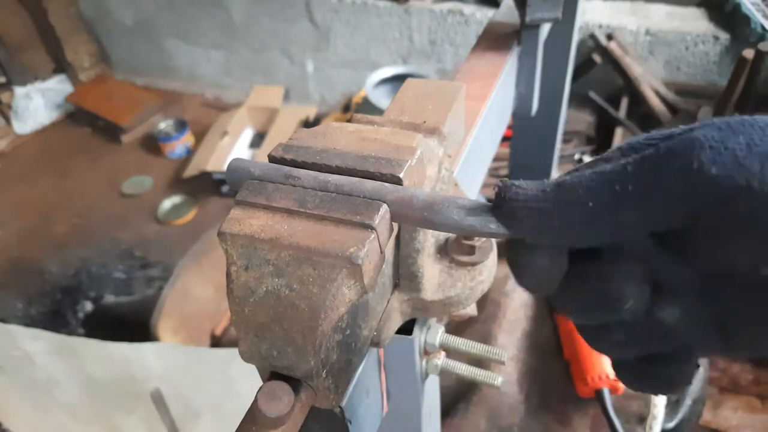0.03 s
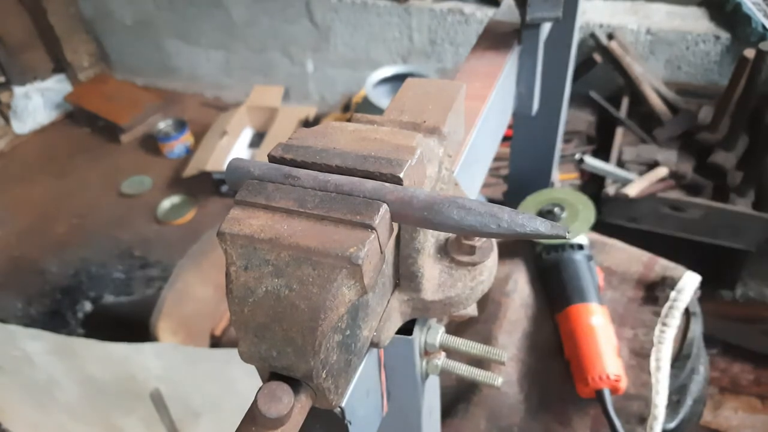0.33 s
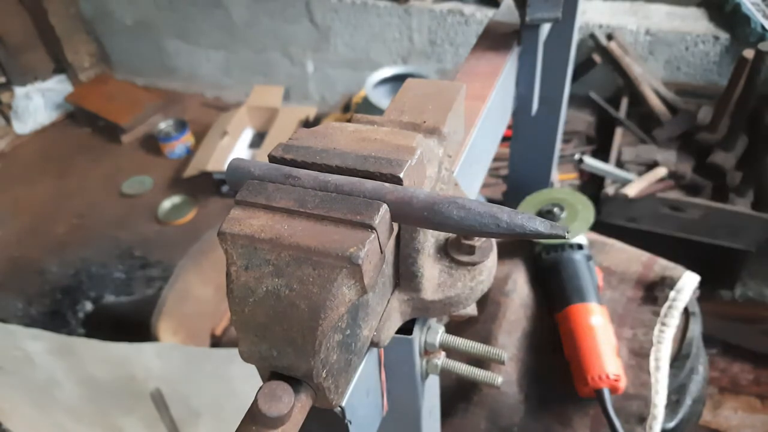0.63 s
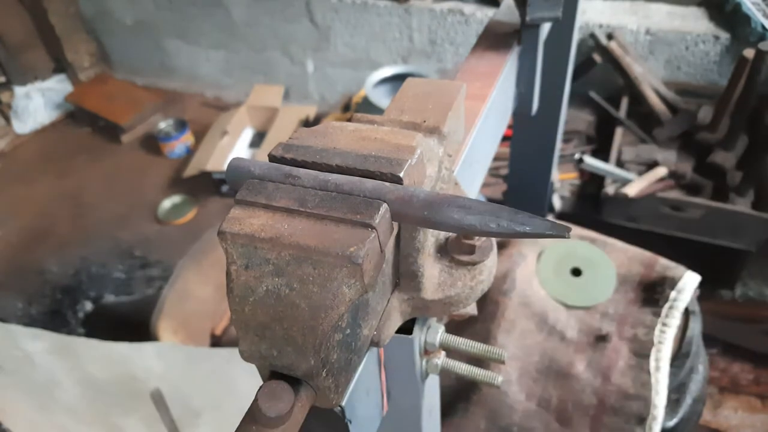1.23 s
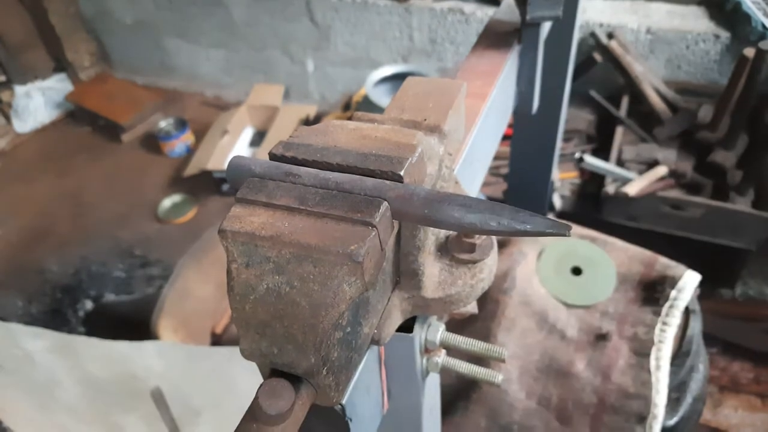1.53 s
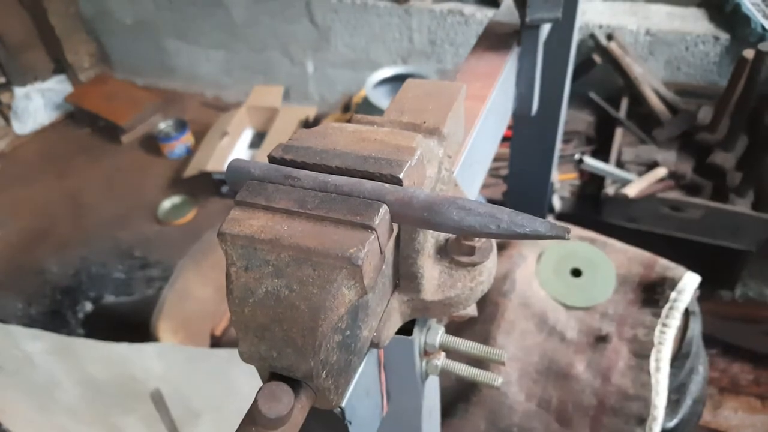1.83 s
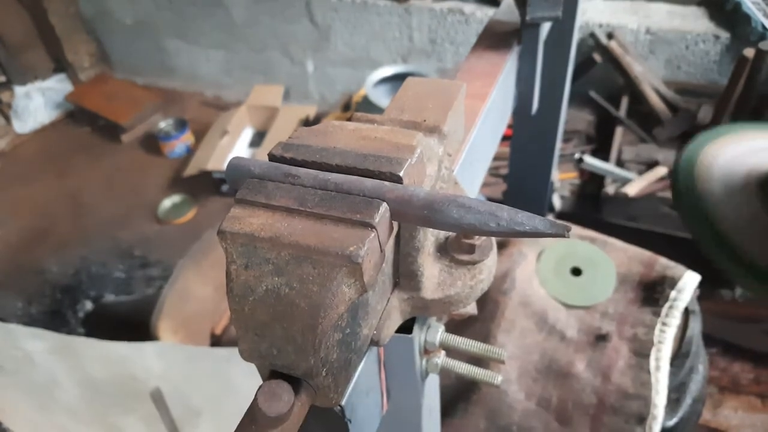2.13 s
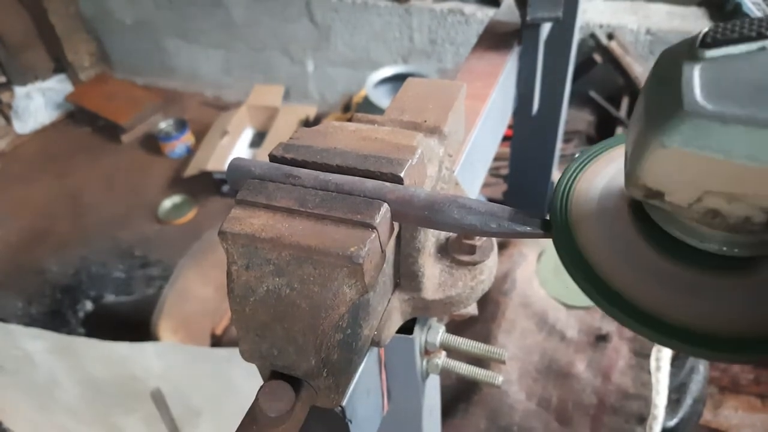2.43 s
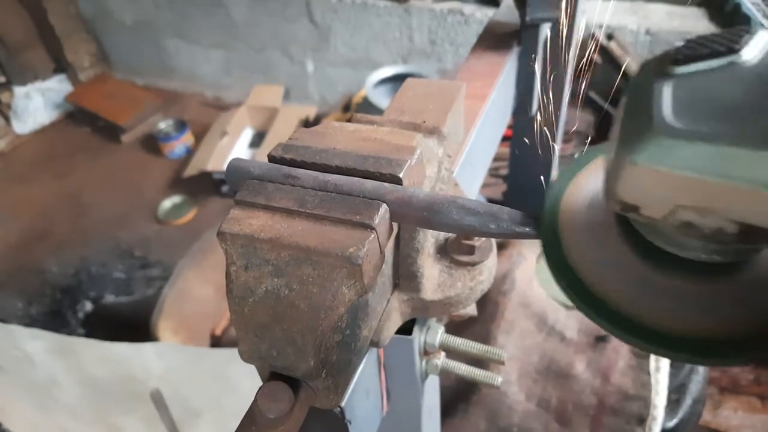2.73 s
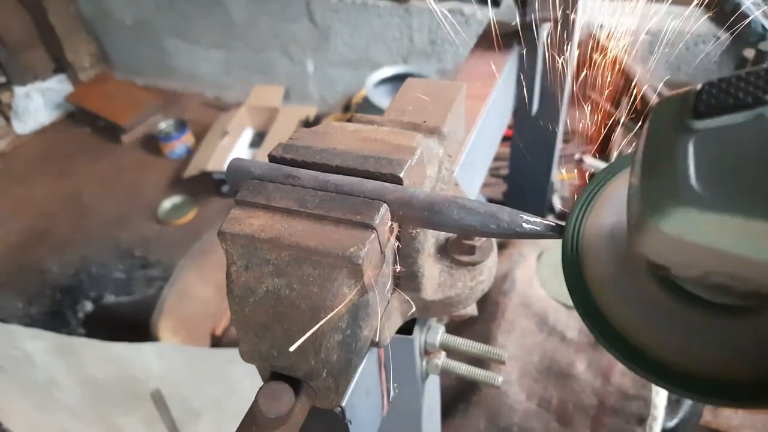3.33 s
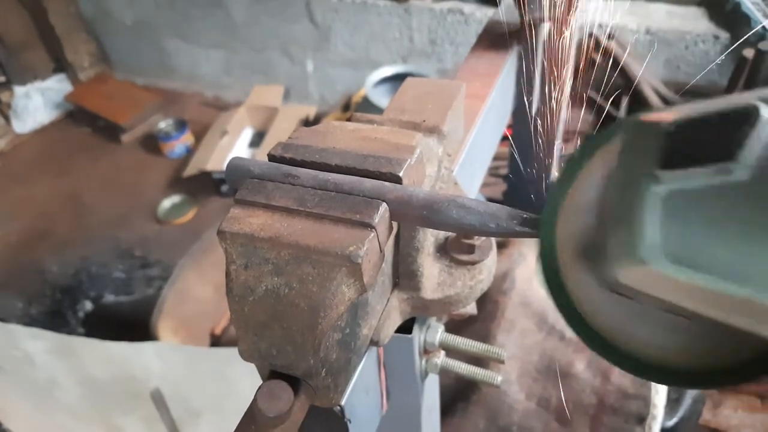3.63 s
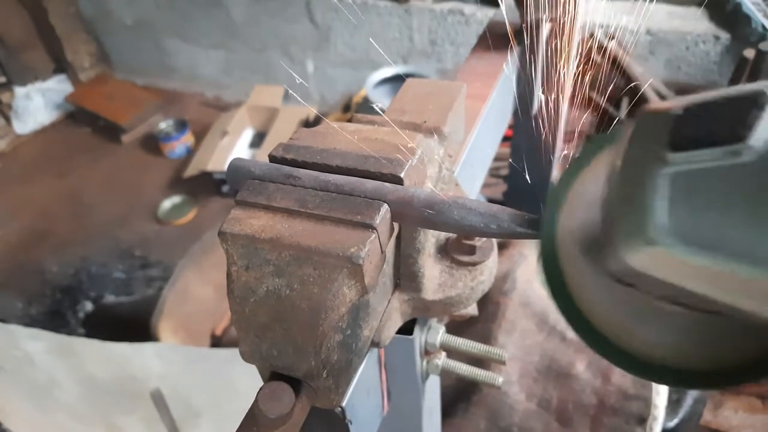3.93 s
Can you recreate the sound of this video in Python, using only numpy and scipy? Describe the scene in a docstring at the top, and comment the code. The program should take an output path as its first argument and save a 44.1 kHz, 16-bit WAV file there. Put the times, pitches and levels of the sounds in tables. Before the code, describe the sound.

An electric angle grinder starts, runs with a high whine, then rasps against steel.

```python
"""A glove rubs and bumps on an angle grinder as a hand picks it up in a quiet workshop.
The switch closes: the gears jolt, the motor winds up, and its cooling air buffets the right microphone.
The tool comes closer, its motor whining over the rush of the fan and the rattle of the gears.
Then the disc bites into a steel rod held in a vise: grit rasps, the rod rings and the motor slows a bit."""
import sys
import numpy as np
from scipy import signal
from scipy.fft import rfft, irfft
from scipy.io import wavfile
from scipy.ndimage import map_coordinates

SR = 44100
rng = np.random.default_rng(int(sys.argv[2]) if len(sys.argv) > 2 else 0)


def put_to_file(sound):
    """Save the sound as 16-bit audio at rate SR, in the file named by the first command-line argument."""
    columns = np.atleast_2d(sound).T  # one column per channel
    safe = np.clip(columns, -1, 1)
    whole_steps = np.round(safe * 32767)
    wavfile.write(sys.argv[1], SR, whole_steps.astype(np.int16))


N = 176400
TIME, FREQS = np.arange(N) / SR, np.fft.rfftfreq(N, 1 / SR)
LEFT_LAG_S = 0.0003738  # sound reaches the left microphone this much later


def amp(db):
    """Turns decibels into a gain."""
    return 10 ** (np.asarray(db) / 20)


def unit(x):
    """Scales a signal to an average (rms) strength of 1."""
    return x / np.sqrt(np.mean(x ** 2) + 1e-20)


def curve(table, column=1):
    """Joins the points of a time table with straight lines."""
    rows = np.array(table, float)
    return np.interp(TIME, rows[:, 0], rows[:, column])


def across_freqs(table):
    """Joins the points of a frequency table along a scale of octaves."""
    hz, value = np.transpose(table)
    return np.interp(np.log(FREQS + 1), np.log(hz + 1), value)


def angle(hz):
    """The angle, in radians, swept by something turning at a changing rate."""
    return 2 * np.pi * np.cumsum(hz) / SR


def wander(hz):
    """Smooth random motion, mostly slower than the given rate."""
    return unit(irfft(rfft(rng.standard_normal(N)) / (1 + (FREQS / hz) ** 4), N))


def noise():
    """Two unrelated white noises, left and right."""
    return rng.standard_normal((2, N))


def grains(per_s, spread_db):
    """Two streams of random clicks of uneven size."""
    clicks = rng.choice([-1, 1], (2, N)) * (rng.random(N) < per_s / SR)
    return clicks * amp(spread_db * np.minimum(rng.exponential(1, N), 3))


def colour(x, spectrum):
    """Shapes the bass and treble of a signal, at strength 1."""
    return unit(irfft(rfft(x) * amp(across_freqs(spectrum)), N))


def ring(x, hz, width):
    """A resonance: keeps a band around one pitch, at strength 1."""
    return unit(irfft(rfft(x) / (1 + 1j * (FREQS - hz) / (0.69 * width)) ** 2, N))


def swell(start, length, peak=0.22):
    """A rise and fall; peak (0-1) says how far along its top lies."""
    progress = np.clip((TIME - start) / length, 0, 1)
    skew = np.log(.5) / np.log(np.clip(peak, .01, .9))
    return np.sin(np.pi * progress ** skew)


def strike(start, fade_s):
    """A sudden onset that dies away."""
    age = TIME - start
    return (age >= 0) * np.exp(-abs(age) / fade_s)


def pan(db):
    """Left and right gains; a positive number favours the left."""
    return amp([[db / 2], [-db / 2]])


# How alike the two microphones sound. Each row: frequency in Hz, likeness from 0 to 1.
MIC_LIKENESS = [(40, 0.72), (250, 0.55), (500, 0.68), (1100, 0.74), (2500, 0.13), (7000, 0), (10000, 0),
                (15000, 0.5)]
def from_right(pair):
    """Turns two unrelated signals into a source that reaches the right microphone first."""
    right, other = rfft(pair)
    same = np.clip(across_freqs(MIC_LIKENESS), 0, 1)
    left = (same * right + np.sqrt(1 - same ** 2) * other) * np.exp(-2j * np.pi * FREQS * LEFT_LAG_S)
    return irfft(np.array([left, right]), N)


# Echoes off the vise and bench. Each row: first delay in seconds, its drift per second, level in dB.
BENCH_ECHOES = [(.0013, -0.0049, -10.5), (.0034, -0.0051, -11.5), (.0071, -0.005, -13)]
def reflect(pair):
    """Adds nearby reflections whose paths change as the tool moves, at strength 1."""
    echoes = 0
    for delay, drift, db in BENCH_ECHOES:
        position = (TIME - delay - drift * TIME) * SR
        echoes += amp(db) * np.array([map_coordinates(side, [position], order=3) for side in pair])
    return unit(pair + echoes)


def room(pair, decay_s=0.19, echo_db=-9):
    """Adds the workshop's short echo, which smears gliding tones and makes steady ones waver."""
    age = TIME[:SR // 2]
    tail = noise()[:, :len(age)] * amp(-60 * age / decay_s)
    tail /= np.linalg.norm(tail[0])
    return pair + amp(echo_db) * signal.fftconvolve(pair, tail, axes=1)[:, :N]


# The workshop's air. Each row: frequency in Hz, relative level in dB.
WORKSHOP_SPECTRUM = [(15, -29), (25, -6), (410, -8.5), (3000, -16), (4600, -22.5), (15500, -33)]
# How loud the air and drone are. Each row: time in seconds, level in dB.
WORKSHOP_LEVEL = [(0, -57.5), (.42, -57), (.55, -52), (1.45, -56.5), (1.6, -78)]
# Thin squeaks. Each row: start in seconds, length in seconds, pitch in Hz, level in dB.
SQUEAKS = [(.27, 0.16, 4230, -61.5), (.53, 0.33, 4290, -62), (.74, 0.23, 4560, -61.5),
           (0.929, 0.26, 4200, -63)]
def background():
    """Workshop air, a low drone and faint, rough squeaks."""
    air = colour(from_right(noise()), WORKSHOP_SPECTRUM)
    drone = amp(-7) * ring(from_right(noise()), hz=92.6, width=18.4)
    squeaks = sum(amp(db) * ring(noise(), hz, width=64) * np.sqrt(abs(swell(start, length, peak=0.36)))
                  for start, length, hz, db in SQUEAKS)
    return (air + drone) * amp(curve(WORKSHOP_LEVEL)) + squeaks


# The dull body and the bright hiss of rubbing cloth. Each row: frequency in Hz, relative level in dB.
RUB_BODY = [(60, -5), (330, -0.5), (800, -0.5), (1400, 2.5), (2600, -5.5), (4200, -7), (6000, -27),
            (15000, -45)]
RUB_HISS = [(500, -2.5), (3000, -1.5), (5500, -4.5), (9000, -4.5), (12000, -8), (15600, -18)]
# Glove and sleeve rubs. Each row: start and length in seconds, body and hiss in dB, peak place (0-1).
RUBS = [(.008, 0.15, -45, -49, 0.26), (0.248, 0.073, -63, -57.5, 0.35), (0.484, 0.14, -55.5, -49.5, 0.23),
        (0.615, 0.04, -50, -52, 0.47), (0.69, 0.062, -49, -72, 0.52), (0.776, 0.11, -47, -55, 0.25),
        (0.975, 0.072, -51, -62, 0.06), (1.038, 0.15, -49, -52, 0.27)]
# Soft bumps of the tool. Each row: start in seconds, pitch in Hz, level in dB.
BUMPS = [(0.236, 304, -48.5), (.618, 2750, -57), (.69, 2090, -55), (.7, 397, -50), (1.045, 620, -55.5),
         (1.104, 334, -47.5)]
# Ticks and snags as the hand grips. Each row: start in seconds, level in dB.
TICKS = [(.246, -54), (0.478, -50), (0.907, -50), (.929, -44.5), (.941, -59)]
def handling():
    """Cloth rubs, bumps and ticks as the tool is lifted."""
    body = reflect(colour(from_right(noise() + grains(1200, spread_db=6.5)), RUB_BODY))
    body *= amp(2 * wander(65))
    hiss = colour(noise() + grains(1000, spread_db=6.5), RUB_HISS)
    rubs = sum(swell(start, length, peak) * (amp(body_db) * body + amp(hiss_db) * hiss)
               for start, length, body_db, hiss_db, peak in RUBS)
    bumps = sum(swell(start, length=0.079, peak=0.15) * amp(db) * ring(body, hz, width=106)
                for start, hz, db in BUMPS)
    sharp_hiss = unit(np.gradient(hiss, axis=1))
    ticks = sharp_hiss * sum(amp(db) * strike(start, fade_s=0.0059) for start, db in TICKS)
    return rubs + bumps + ticks


SWITCH_S = 1.125
POWERED_S = np.maximum(TIME - SWITCH_S, 0)  # how long the motor has had power
RUNNING = np.minimum(POWERED_S / 0.017, 1)  # a quick fade-in as the switch closes

# Cooling air hitting the microphone. Each row: time in seconds, level in dB before it overloads.
GUST_LEVEL = [(1.145, -65), (1.165, -26), (1.205, -32), (1.22, -26), (1.25, -33), (1.29, -25),
              (1.335, -27.5), (1.355, -38.5), (1.4, -28.5), (1.415, -37.5), (1.445, -26), (1.492, -24),
              (1.506, -44), (1.67, -115)]
# The rumble of that air. Each row: frequency in Hz, relative level in dB.
GUST_SPECTRUM = [(20, -40), (70, 3), (180, -0.5), (330, -3), (600, -12), (1200, -18), (2500, -26),
                 (6000, -49)]
def gust(overload_db=-18.5, left_db=-25):
    """Swirling air overloads the right microphone's opening; the strongest swirls are brightest."""
    swirls = wander(85)
    rumble = colour(noise(), GUST_SPECTRUM)
    dull = signal.sosfilt(signal.butter(2, 450, fs=SR, output="sos"), rumble)
    level = amp(curve(GUST_LEVEL) + 2.6 * swirls) * RUNNING
    brightness = np.clip(0.99 + 0.4 * swirls, 0, 1)
    buffet = (brightness * rumble + (1 - brightness) * dull) * level
    limit = amp(overload_db)
    return limit * np.tanh(buffet / limit) * amp([[left_db], [0]])


# The knock of slack gears. Each row: frequency in Hz, relative level in dB.
JOLT_SPECTRUM = [(100, -20), (330, -15), (700, -12), (1500, -11), (2500, 3.5), (3600, -10), (6000, -18.5),
                 (15000, -19)]
def jolt():
    """The gears take up their slack in a short clatter as the motor starts."""
    clatter = colour(from_right(grains(5000, spread_db=1.0)), JOLT_SPECTRUM)
    return clatter * swell(SWITCH_S, length=0.078) * amp(-36.5) * pan(-2.9)


FIRST_HZ, FREE_HZ, WIND_UP_S = 234, 527.5, .245
# Grinding slows the motor. Each row: time in seconds, turns per second lost.
SPEED_LOST = [(2.5, 0), (2.87, 4.4), (3.22, 2.3), (3.42, 10.5), (3.7, 13), (4, 19)]
def speed():
    """Shaft turns per second: the motor winds up towards its free speed, then sags under load."""
    return FREE_HZ - (FREE_HZ - FIRST_HZ) * np.exp(-POWERED_S / WIND_UP_S) - curve(SPEED_LOST)


# The tool starts and swings closer. Each row: time in seconds, relative level in dB.
TOOL_LEVEL = [(1.12, -80), (1.16, -42.5), (1.22, -42), (1.33, -47.5), (1.48, -48), (1.7, -43), (2.02, -43),
              (2.2, -37.5), (2.4, -34.5), (2.65, -34.5), (3.05, -35), (3.35, -35.5), (3.7, -34.5),
              (3.97, -37)]
# The rush of fan and gears. Each row: frequency in Hz, relative level in dB.
FAN_SPECTRUM = [(40, -37), (130, -23.5), (260, -13), (400, -8.5), (800, -10), (1050, -2.5), (1500, -2.5),
                (2000, -5.5), (2700, -1), (4200, -3), (6800, -5), (8700, -1), (10000, -6), (11500, -6),
                (13500, -8.5), (15600, -12)]
# Ringing of the gear housing and disc guard, then what is heard instead while the tool is turned away.
# Each row: pitch in Hz, width in Hz, level in dB compared with the rush.
HOUSING_RINGS = [(2590, 400, -15), (3160, 100, -16.5), (5540, 450, -11.5), (7480, 420, -13.5)]
AWAY_RINGS = [(1520, 93, -15.5), (2260, 530, -8.5), (4500, 710, -10.5)]
# The tool's head turns to the microphones. Each row: time in seconds, from 0 (away) to 1 (facing).
FACING = [(1.98, 0), (2.15, 0.99)]
def fan_and_gears(shaft_hz):
    """Air rushes, gears rattle in time with the shaft and the housing rings; speed brightens it all."""
    throb = 1 + 0.67 * np.cos(angle(shaft_hz))
    air_and_rattle = from_right(noise() + amp(-5) * unit(grains(1600, spread_db=2.5)) * throb)
    shake = from_right(noise())
    head, away = (sum(amp(db) * ring(shake, hz, width) for hz, width, db in table)
                  for table in (HOUSING_RINGS, AWAY_RINGS))
    rush = colour(air_and_rattle, FAN_SPECTRUM) + away + (head - away) * curve(FACING)
    dull = signal.sosfiltfilt(signal.butter(2, 4500, fs=SR, output="sos"), rush)
    treble = (rush - dull) * (shaft_hz / FREE_HZ) ** 0.69
    level = amp(curve(TOOL_LEVEL) - 1 + 1.1 * wander(82))
    return reflect(dull + treble) * level * RUNNING * pan(-1.5)


def growl(tooth_hz, width_hz=160, fade_db_per_s=67):
    """Loaded gears: rough noise around the rate at which teeth meet, fading as the disc speeds up."""
    rough = wander(width_hz) + 1j * wander(width_hz)
    band = (rough * np.exp(1j * angle(tooth_hz))).real
    return band * amp(-48.5 - fade_db_per_s * POWERED_S) * pan(-14)


def tone(hz, level_db, pan_db, flutter_db, blur):
    """One tone whose level and phase waver at each microphone with the reflections."""
    sides = []
    for lag in (LEFT_LAG_S, 0):
        level = amp(level_db + flutter_db * wander(18))
        phase = angle(hz) - 2 * np.pi * hz * lag + blur * wander(35.4)
        sides.append(level * np.sin(phase))
    return np.sqrt(2) * pan(pan_db) * np.array(sides)


# The shaft's hum. Each row: cycles per turn, dB added to TOOL_LEVEL, phase blur in radians.
SHAFT_TONES = [(1, -14.5, 0.52), (2, -22, 0.21), (6, -20.5, 1.)]
# The whine is beamed, so it changes as the tool turns.
# Each row: time in seconds, relative level in dB of the whine, then of its octave.
WHINE_LEVELS = [(1.13, -70, -70), (1.18, -56, -62), (1.23, -51, -66), (1.265, -60, -37.5),
                (1.45, -67, -50.5), (1.62, -58, -45.5), (1.73, -54, -62), (1.92, -52, -58),
                (2.07, -51, -45), (2.22, -52, -43), (2.48, -48, -39), (2.7, -47, -43), (2.86, -50, -49),
                (2.95, -39.5, -38), (3.1, -46, -66), (3.32, -47, -54), (3.5, -44, -55), (3.62, -54, -50),
                (3.97, -48, -51)]
def motor(shaft_hz, slots=12):
    """The shaft hums, the gears growl and the slotted rotor whines, all following the speed."""
    hum = sum(tone(cycles * shaft_hz, curve(TOOL_LEVEL) + db, pan_db=-2, flutter_db=1.5, blur=blur)
              for cycles, db, blur in SHAFT_TONES)
    whine_hz = slots * shaft_hz
    whine = tone(whine_hz, curve(WHINE_LEVELS) - 3, pan_db=5.5, flutter_db=2.5, blur=0.83)
    octave = tone(2 * whine_hz, curve(WHINE_LEVELS, 2) - 1.5, pan_db=-9.5, flutter_db=1.7, blur=0.32)
    rasp = 1 + .4 * wander(260)  # the whine's level shakes quickly, roughening it
    return (hum + growl(whine_hz) + room((whine + octave) * rasp)) * RUNNING


# The disc bites into the rod. Each row: start in seconds, length in seconds, relative level in dB.
BITES = [(2.683, 0.22, -43.5), (3.128, 0.26, -44), (3.385, 0.35, -42), (3.732, 0.15, -43),
         (3.896, 0.16, -45)]
# Its hardest catches. Each row: start in seconds, relative level in dB.
CATCHES = [(2.78, -36.5), (2.82, -37), (3.158, -38), (3.335, -35.5), (3.36, -38), (3.72, -34.5),
           (3.79, -35), (3.87, -32.5), (3.931, -37), (3.959, -32)]
# Grit scraping steel. Each row: frequency in Hz, relative level in dB.
SCRAPE_SPECTRUM = [(25, -5.5), (80, 1.5), (300, -1), (700, 3), (1500, -10), (4000, 0.5), (8000, -19),
                   (12000, -1), (15600, -2)]
# The rod's own notes. Each row: pitch in Hz, width in Hz, relative level in dB.
ROD_RINGS = [(2510, 107, 2.5), (2710, 190, -1.5), (5690, 140, -2.5), (8180, 350, -0.5), (11340, 270, 1),
             (15250, 400, -5)]
# The ringing grows as the disc settles on the rod. Each row: time in seconds, relative level in dB.
ROD_LEVEL = [(2.9, -4.5), (3.4, 0.5)]
def grinding(shaft_hz, gear_ratio=3, turns_per_bounce=4, catch_fade_s=0.0031):
    """Grit rasps over the rod as the disc wobbles, bounces and catches; the rod rings and squeals."""
    pressure = sum(amp(db) * np.sqrt(abs(swell(start, length, peak=0.41))) for start, length, db in BITES)
    disc_angle = angle(shaft_hz) / gear_ratio
    wobble = .4 * np.cos(disc_angle)  # the disc presses harder once a turn
    bounce = .55 * np.cos(disc_angle / turns_per_bounce)
    contact = unit(np.exp(wobble + bounce))
    small_catches = abs(grains(per_s=37, spread_db=3.5)[0])
    chatter = signal.lfilter([1], [1, -np.exp(-1 / (catch_fade_s * SR))], small_catches)
    hard_catches = sum(amp(db) * strike(start, catch_fade_s) for start, db in CATCHES)
    push = pressure * contact * unit(1 + chatter) + hard_catches
    grit = unit(grains(per_s=2500, spread_db=2.0)) + 0.59 * noise()
    rasp = grit * push
    scrape = colour(from_right(rasp), SCRAPE_SPECTRUM) * amp(1)
    rod = unit(sum(amp(db) * ring(rasp, hz, width) for hz, width, db in ROD_RINGS))
    rod = rod * amp(curve(ROD_LEVEL)) * pan(-2)
    squeal = ring(noise(), hz=11380, width=150) * swell(start=3.2, length=.125, peak=0.54) * amp(-40.5)
    average_push = np.sqrt(np.mean(push ** 2))
    return (scrape + rod) * average_push + squeal


def scene():
    """All sources at the two microphones."""
    shaft_hz = speed()
    return (background() + handling() + jolt() + gust()
            + motor(shaft_hz) + fan_and_gears(shaft_hz) + grinding(shaft_hz))


def record(dry, cutoff_hz=15900):
    """Removes the very highest treble."""
    lowpass = signal.firwin(511, cutoff_hz, window=("kaiser", 9), fs=SR)
    return signal.oaconvolve(dry, lowpass[None], "same")


dry = scene()
out = record(dry)
put_to_file(out)
```